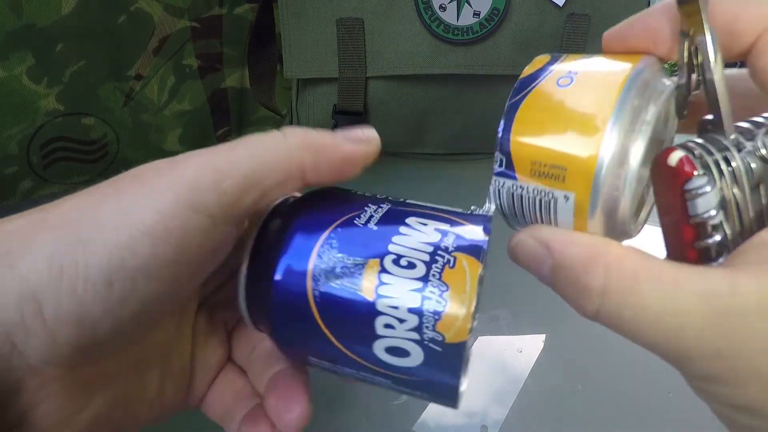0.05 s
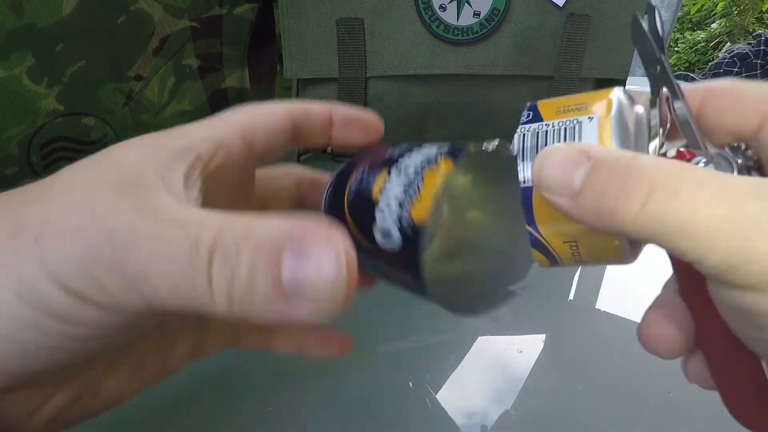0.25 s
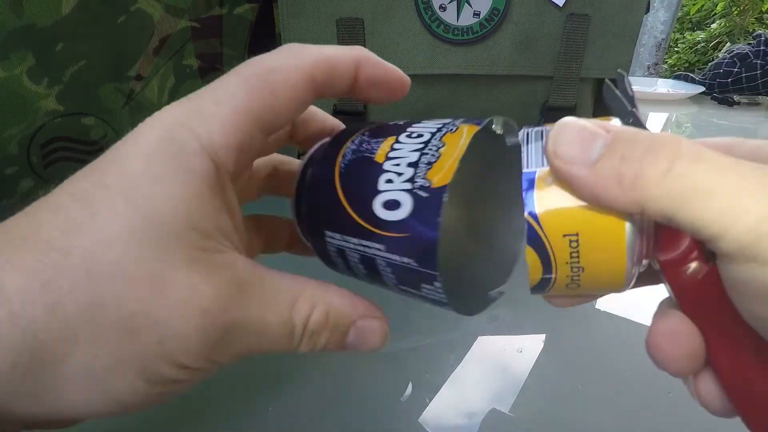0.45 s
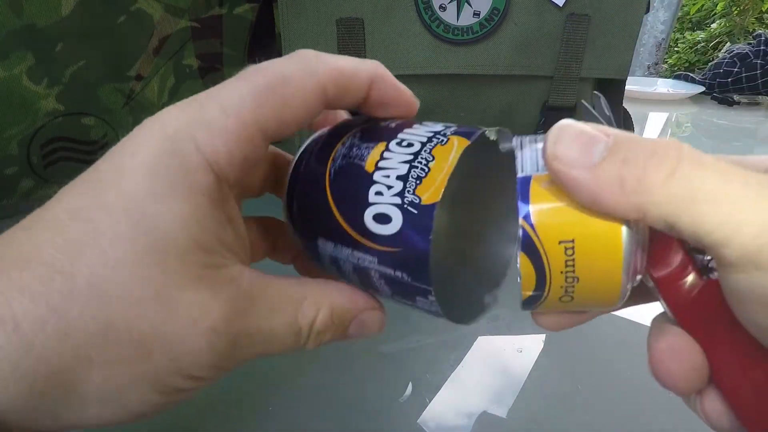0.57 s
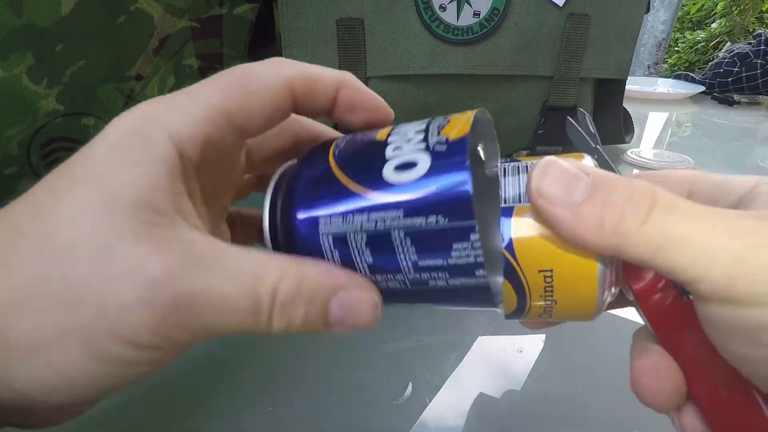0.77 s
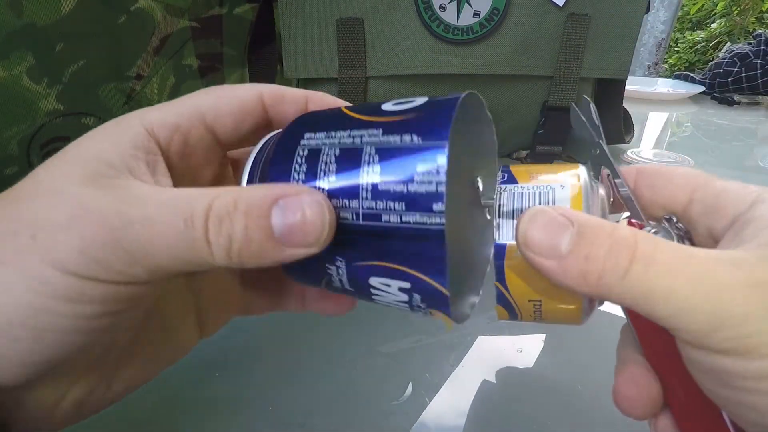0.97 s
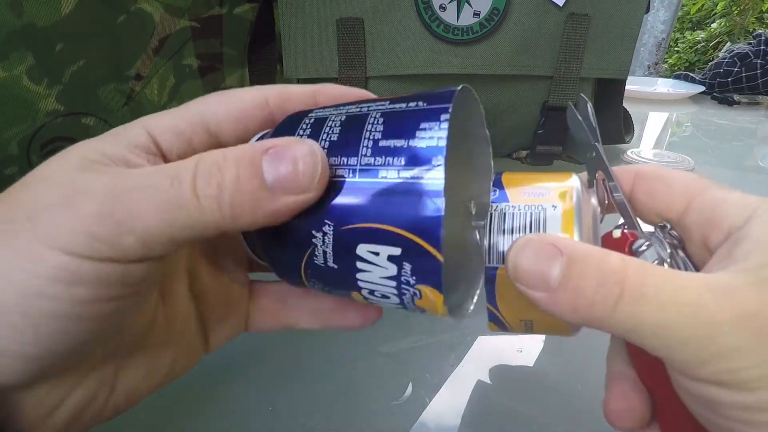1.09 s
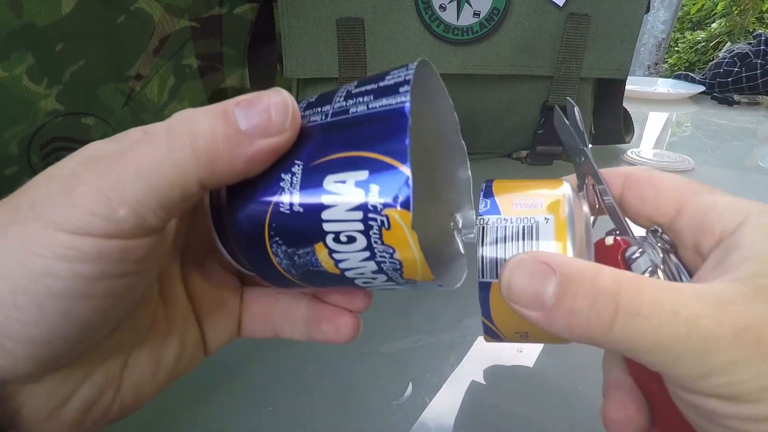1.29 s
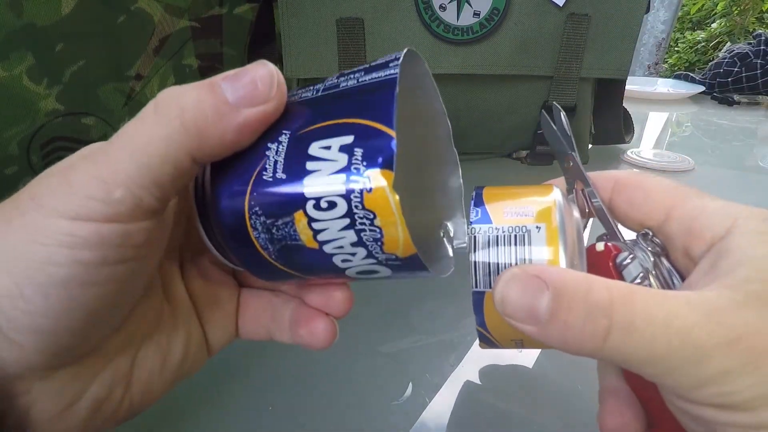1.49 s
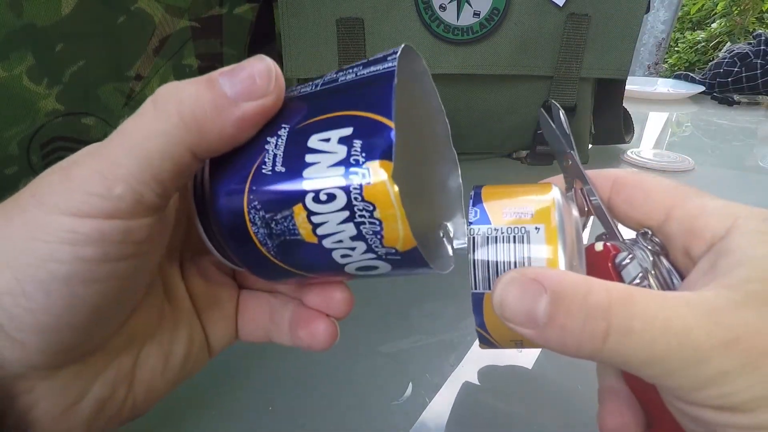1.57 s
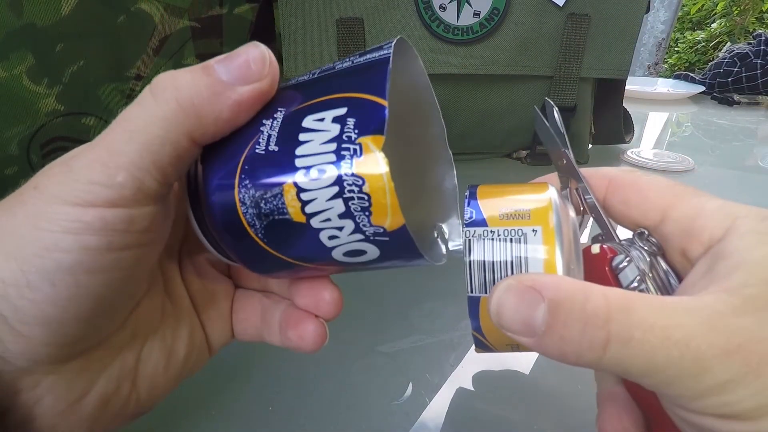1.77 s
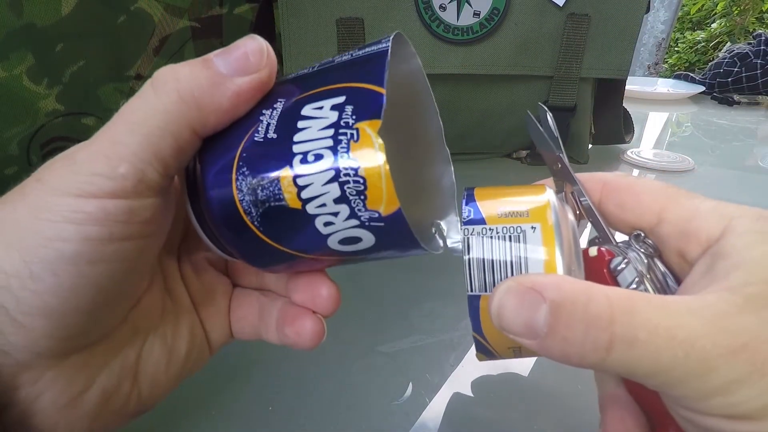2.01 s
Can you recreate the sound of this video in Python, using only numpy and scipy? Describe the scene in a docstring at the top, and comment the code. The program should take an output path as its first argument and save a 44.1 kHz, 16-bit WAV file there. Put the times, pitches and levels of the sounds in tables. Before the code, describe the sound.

A thin aluminium can scrapes, crackles and tears by hand, ending with a light ping.

```python
"""Outdoors, two hands bend and twist the halves of a cut aluminium can, joined by a narrow strip.
From the start the hands rumble and thump, and the cut edges scrape on and off for a second.
At 0.2 s the thin wall begins to snap as it buckles. At 0.7 s the strip tears in a dense crackle,
and more snaps follow. From about 1 s faint far whistles, probably birds, sound in the quiet air.
At 1.3 s the small half springs back with a ping, leaving the air, the rumble and the last whistles."""
import sys
import numpy as np
from scipy import signal
from scipy.fft import rfft, irfft
from scipy.io import wavfile

SR = 44100
rng = np.random.default_rng(int(sys.argv[2]) if len(sys.argv) > 2 else 0)


def output_pcm(signal):
    """Save a mono or channel-first signal as 16-bit PCM at the path in sys.argv[1].

    Samples are clipped to [-1, 1] before scaling.
    """
    pcm = np.clip(np.atleast_2d(signal).T, -1, 1) * 32767
    wavfile.write(sys.argv[1], SR, np.round(pcm).astype(np.int16))


N = 90404


def undb(db):
    """Turn decibels into a number to multiply by."""
    return 10 ** (np.asarray(db) / 20)


def unit(x):
    """Scale a sound to an average strength (rms) of 1."""
    return x / np.sqrt(np.mean(x ** 2))


def since(start):
    """Seconds since a moment, zero before it."""
    return np.maximum(np.arange(N) / SR - start, 0)


def fade(start, t60):
    """Start suddenly, then die away; t60 is the fade time, the seconds it takes to drop 60 dB."""
    t = since(start)
    return (t > 0) * np.exp(-np.log(1000) * t / t60)


def swell(start, rise_s):
    """Climb smoothly from silence to full level."""
    return 1 - np.exp(-since(start) / rise_s)


def place(x, start):
    """Put a short sound at a moment."""
    return np.concatenate([np.zeros(max(int(start * SR), 0)), x, np.zeros(N)])[:N]


def through(x, response):
    """Pass a sound through a response: the sound something makes after one sharp tap."""
    return signal.fftconvolve(x, response)[:N]


def butter(hz, kind, order=4):
    """A smooth filter that keeps the lows, the highs or a band between."""
    return signal.butter(order, hz, kind, fs=SR, output="sos")


def band_of(response, band):
    """One band of a response, scaled to an energy of 1."""
    part = signal.sosfilt(band, response)
    return part / np.linalg.norm(part)


def colour(points, size=8192):
    """A response with the given balance of low and high frequencies, and an energy of 1."""
    hz, db = np.array(points).T
    freqs = np.maximum(np.fft.rfftfreq(size, 1 / SR), 1)
    gains = undb(np.interp(np.log(freqs), np.log(hz), db))
    # fold the response forward in time, so nothing sounds before the tap
    cepstrum = irfft(np.log(gains))
    cepstrum[1:size // 2] *= 2
    cepstrum[size // 2 + 1:] = 0
    response = irfft(np.exp(rfft(cepstrum)))
    return response / np.linalg.norm(response)


def ring(tones, size=12000):
    """The fading tones of a tapped object; neighbours swing in opposite directions."""
    t = np.arange(size) / SR
    return sum((-1) ** k * undb(db) * np.sin(2 * np.pi * hz * t) * np.exp(-np.log(1000) * t / t60)
               for k, (hz, db, t60) in enumerate(tones))


def grains(per_s, size=N, spread_db=4):
    """A dense run of tiny random ticks of uneven strength."""
    strength = undb(spread_db * np.minimum(rng.exponential(size=size), np.pi))
    ticks = rng.random(size) < per_s / SR
    return unit(ticks * strength * rng.choice([-1, 1], size))


def jitter(up_to_hz=130):
    """Quick random wavering."""
    return unit(signal.sosfilt(butter(up_to_hz, "lowpass", order=2), rng.standard_normal(N)))


# The tone of the air. Each row: frequency in Hz, relative level in dB.
AIR_COLOUR = [(150, -7.5), (1760, -17.5), (5150, -22), (14800, -34.5)]
def air(level_db=-63):
    """Quiet outdoor air: a soft, steady hiss."""
    return undb(level_db) * unit(through(rng.standard_normal(N), colour(AIR_COLOUR)))


# Far whistles. Each row: start in seconds, length in seconds, first and last pitch in Hz,
# level in dB, roughness from 0 (clear) to 1 (all flutter).
WHISTLE_CALLS = [(1.05, 0.13, 3084, 3030, -63, 0.85), (1.149, 0.081, 1975, 1866, -56.5, 0.7),
                 (1.228, 0.11, 1880, 1930, -53.5, 0.15), (1.44, 0.065, 5230, 5160, -68, .9),
                 (1.903, 0.12, 2734, 2960, -67, .4)]
def whistles():
    """Faint gliding whistles, probably birds, some clear and some fluttering."""
    flutter = (jitter() + 1j * jitter()) / np.sqrt(2)  # wavers in both level and pitch
    out = 0
    for start, length, first_hz, last_hz, db, rough in WHISTLE_CALLS:
        progress = np.minimum(since(start) / length, 1)
        hz = first_hz + (last_hz - first_hz) * progress
        tone = np.exp(2j * np.pi * np.cumsum(hz) / SR)
        waver = np.sqrt(1 - rough) + np.sqrt(rough) * flutter
        arch = np.sqrt(np.abs(np.sin(np.pi * progress)))
        out += undb(db) * arch * (tone * waver).imag
    return out


def echo(x, level_db=-28.5, fade_s=0.43):
    """The surroundings send back a faint, dull wash of sound."""
    tail = rng.standard_normal(N) * fade(0, fade_s)
    tail = signal.sosfilt(butter(2000, "lowpass", order=2), tail)
    return undb(level_db) * through(x, tail / np.linalg.norm(tail))


# The tone of the hands' rumble. Each row: frequency in Hz, relative level in dB.
RUMBLE_COLOUR = [(12, -10), (30, 0), (60, -6), (110, -14.5), (400, -31), (1000, -53.5)]
# How the rumble rises and falls. Each row: time in seconds, level in dB.
RUMBLE_LOUDNESS = [(0, -48), (0.48, -40.5), (0.75, -47), (1.15, -46.5), (1.35, -52), (1.6, -49.5),
                   (2.05, -54.5)]
# Soft thumps. Each row: start in seconds, pitch in Hz, level in dB, fade time in seconds.
HAND_THUMPS = [(0.066, 123.3, -30.5, 0.083), (0.217, 252, -20, 0.012), (0.23, 126, -28.5, 0.06),
               (0.452, 46, -34, 0.077), (0.693, 107, -28.5, 0.057), (0.854, 134, -10.5, 0.013),
               (0.969, 93, -17, 0.024), (1.133, 173, -33, 0.032)]
def hands():
    """The moving hands make a low rumble and soft thumps."""
    times, levels_db = np.array(RUMBLE_LOUDNESS).T
    rumble = unit(through(rng.standard_normal(N), colour(RUMBLE_COLOUR)))
    out = rumble * undb(np.interp(since(0), times, levels_db))
    for start, hz, db, t60 in HAND_THUMPS:
        out += place(ring([(hz, db, t60)]), start) * swell(start, rise_s=0.0016)
    return out


# The tones of the can's large half. Each row: pitch in Hz, relative level in dB, fade time in seconds.
LARGE_HALF_TONES = [(586, -20, 0.028), (1156, -2.5, 0.035), (1252, -9.5, 0.13), (1310, -4.5, 0.0199),
                    (1768, -24, 0.09), (2174, -19, 0.1316), (2345, -18.5, .055), (3150, -16.5, 0.085),
                    (4020, -21, 0.083), (4820, -21, 0.0926), (5790, -22, 0.054)]
# The tone of crackling metal. Each row: frequency in Hz, relative level in dB.
METAL_COLOUR = [(150, -12), (600, -2), (1150, 0.5), (2200, 2), (3300, -3), (5000, -5), (8000, -5),
                (12000, -11)]
def thin_wall(ring_db, wash_db=-1, wash_fade_s=0.018, size=8192):
    """One spot on the wall answers a tap with a tick, a wash of crowded tones and its main tones."""
    wash = rng.standard_normal(size) * np.exp(-np.log(1000) * np.arange(size) / SR / wash_fade_s)
    tap = undb(wash_db) * wash / np.linalg.norm(wash)
    tap[0] += 1  # the tick itself
    tones = ring(LARGE_HALF_TONES)
    response = through(tap, colour(METAL_COLOUR))[:size]
    response += undb(ring_db) * tones[:size] / np.linalg.norm(tones)
    return response / np.linalg.norm(response)


def bursts(rows, ticks_per_s, ring_db, size=14000):
    """Runs of tiny slips or breaks swell and die away, each at its own spot on the wall."""
    bands = [butter([200, 845], "bandpass"), butter([845, 3880], "bandpass"), butter(3880, "highpass")]
    out = 0
    for peak, rise, t60, *levels_db in rows:
        start = max(peak - 10 * rise, 0)
        from_peak = np.arange(size) / SR + start - peak
        force = np.exp(np.minimum(from_peak / rise, -np.log(1000) * from_peak / t60))
        wall = thin_wall(ring_db)
        response = sum(undb(db) * band_of(wall, band) for db, band in zip(levels_db, bands))
        out += place(through(force * grains(ticks_per_s, size), response), start)
    return out


# Scrapes, and at 0.8175 s one short sharp snap of the buckling wall. Each row: loudest moment, rise time and
# fade time in seconds, # then low, middle and treble levels in dB.
EDGE_SCRAPES = [(0.020, 0.0028, 0.078, -58.5, -51, -60), (0.044, 0.0048, 0.12, -54, -53.5, -46),
                (0.0635, 0.00033, 0.035, -43, -46, -45), (0.094, 0.0012, 0.068, -74, -61, -44),
                (0.133, 0.0024, 0.14, -76.5, -47.5, -54), (0.187, 0.0008, 0.012, -76, -49, -43.5),
                (0.227, 0.0049, 0.092, -46.5, -32, -39), (0.275, 0.0038, 0.062, -43, -45, -29.5),
                (0.3080, 0.00053, 0.021, -44, -43, -23), (0.319, 0.0019, 0.2, -53, -58.5, -46.5),
                (0.384, 0.0042, 0.11, -43, -39.5, -47.5), (0.4425, 0.0016, 0.1, -39.5, -34, -38),
                (0.459, 0.0021, 0.059, -53, -51, -32.5), (0.511, 0.0006, 0.024, -47, -50.5, -49),
                (0.543, 0.019, 0.15, -54, -60, -44), (0.591, 0.0066, 0.073, -56, -45.5, -37.5),
                (0.635, 0.0077, 0.097, -53, -47, -42.5), (0.694, 0.0022, 0.098, -48, -48.5, -46),
                (0.8175, 0.00062, 0.031, -48.5, -33.5, -44), (0.874, 0.009, 0.04, -36.5, -35, -30.5),
                (0.912, 0.016, 0.14, -77, -56, -52.5), (0.966, 0.00098, 0.029, -47, -50.5, -48),
                (0.989, 0.00048, .022, -42.5, -50, -56)]
def scraping_edges():
    """The loose cut edges rub in tiny slips that set the wall ringing; the short run near 0.82 s is a sharp
    snap of the buckling wall."""
    return bursts(EDGE_SCRAPES, ticks_per_s=2000, ring_db=-4)


# The tones of the small half. Each row: pitch in Hz, relative level in dB, fade time in seconds.
SMALL_HALF_TONES = [(1412, -2, 0.054), (2065, -0.5, 0.085), (2285, -14, 0.12), (2800, -22, 0.15),
                    (3516, -5, 0.054), (4470, -2.5, 0.055), (4580, -11, 0.11), (6000, -18.5, 0.12),
                    (7170, -19.5, 0.13), (12700, -12, .042)]
def ping(start=1.3152, ring_db=-33.5, buzz_db=-36.5):
    """The small half springs back with a brief buzz and rings."""
    buzz_colour = colour([(400, -6.5), (1800, 2.5), (4500, -2.5), (7500, -16.5)])
    buzz = through(grains(per_s=3500) * fade(start, t60=0.098), buzz_colour)
    ringing = place(ring(SMALL_HALF_TONES), start)
    return swell(start, rise_s=0.00042) * (undb(ring_db) * ringing + undb(buzz_db) * buzz)


# Surges of tearing. Each row: loudest moment, rise time and fade time in seconds,
# then low, middle and treble levels in dB.
STRIP_TEARS = [(0.7125, 0.00082, 0.13, -30, -20, -21), (0.743, 0.0045, 0.12, -41, -31, -28.5),
               (0.7745, 0.004, 0.094, -50, -43, -25.5), (0.7805, .005, 0.067, -44, -26.5, -29.5)]
def tearing_strip():
    """The tight strip breaks bit by bit, crackling more densely and ringing less than the edges."""
    return bursts(STRIP_TEARS, ticks_per_s=3500, ring_db=-6.5)


# Snapping dents. Each row: start in seconds, first pitch in Hz and its level in dB, second pitch in Hz
# and its level in dB, fade time in seconds, strength of the can's ring in dB, crack level in dB.
DENT_SNAPS = [(0.2159, 1796, -3.5, 2924, 3, 0.00385, -28.5, -25),
              (0.2165, 1794, -7, 2870, -12.5, 0.0089, -36, -26),
              (0.2168, 3275, -9.5, 1253, -9, 0.0155, -34, -24),
              (0.2701, 1880, -25.5, 4850, -36, 0.014, -27, -33.5),
              (0.3073, 3510, -6.5, 8150, -10.5, 0.0046, -28.5, -35),
              (0.7024, 1320, -26.5, 2320, -27, 0.024, -36, -34),
              (0.7101, 1560, -21, 2260, -18, 0.018, -24, -20),
              (0.8557, 1550, -16.5, 609, -22, 0.038, -23, -24.5),
              (0.8592, 1760, -22, 353, -24, 0.027, -22, -23.5),
              (0.869, 1256, -28.5, 3960, -49, 0.16, -60, -32),
              (1.1260, 1200, -39, 1544, -43, 0.033, -54, -49.5),
              (1.1338, 677, -33, 287, -30, 0.021, -46, -39.5)]
def buckling_snaps():
    """A dent flips: it rings briefly at two pitches, shakes the can and gives off a short crack."""
    can_ring = ring(LARGE_HALF_TONES)
    ringing, crack_force = 0, 0
    for start, hz1, db1, hz2, db2, t60, can_db, crack_db in DENT_SNAPS:
        dent = ring([(hz1, db1, t60), (hz2, db2, t60)]) + undb(can_db) * can_ring
        ringing += place(dent, start) * swell(start, rise_s=0.0002)
        crack_force += undb(crack_db) * fade(start, t60=0.016)
    cracks = crack_force * grains(per_s=3500)
    bright_wall = band_of(thin_wall(ring_db=-4), butter([2000, 12000], "bandpass", order=2))
    return ringing + through(cracks, bright_wall)


def scene():
    """The can and its echo over the hands, the air and the whistles, in one channel."""
    can = scraping_edges() + tearing_strip() + buckling_snaps() + ping()
    return (can + echo(can) + hands() + air() + whistles())[None]


def record(dry, top_hz=15450):
    """Cut away the very highest treble."""
    return signal.sosfilt(signal.ellip(12, .2, 80, top_hz, fs=SR, output="sos"), dry)


dry = scene()
out = record(dry)
output_pcm(out)
```